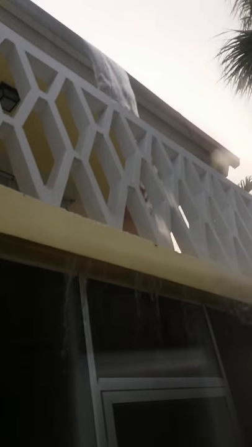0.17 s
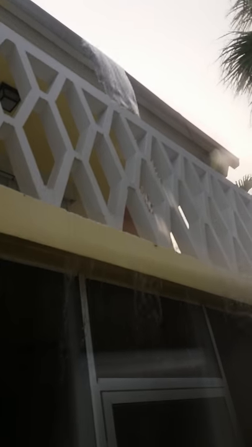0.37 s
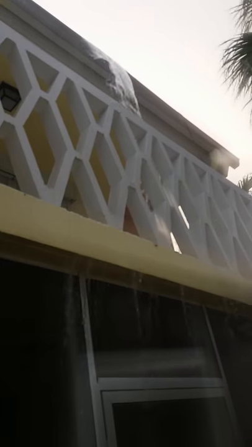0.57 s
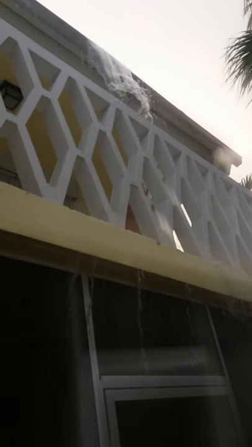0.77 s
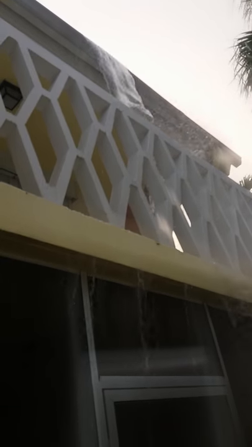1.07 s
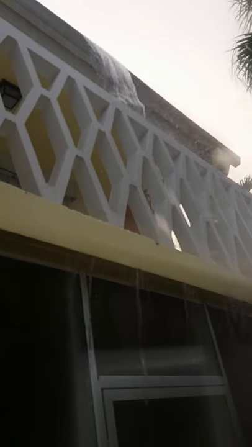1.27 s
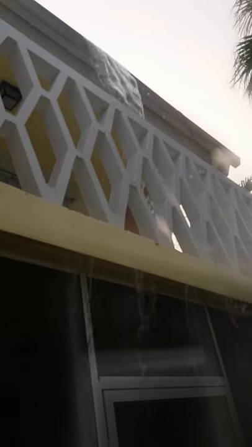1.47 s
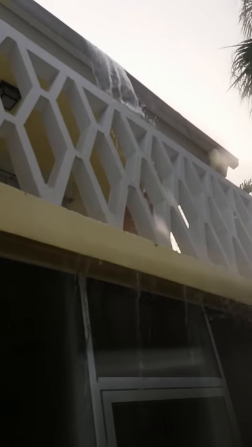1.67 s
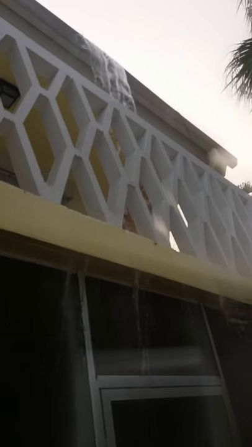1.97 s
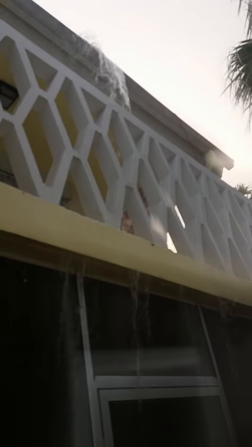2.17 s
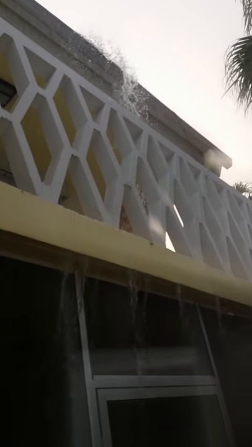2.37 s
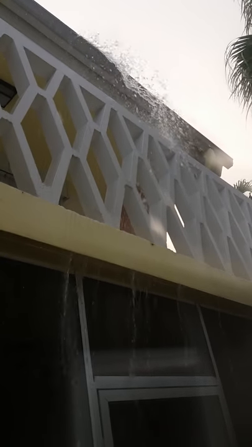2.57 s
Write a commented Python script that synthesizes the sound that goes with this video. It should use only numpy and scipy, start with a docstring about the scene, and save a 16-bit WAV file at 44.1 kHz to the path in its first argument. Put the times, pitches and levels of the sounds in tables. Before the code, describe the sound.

Steady splashing of overflowing gutter water, bright spray and pattering drops, one small thump early on

```python
"""Rainwater overflows a roof gutter onto ledge and ground, over motor hum (sines) and rumble (noise).
From the start: coloured random impacts hiss and patter, noise ticks, sine bubbles ring, lumps splat and slap.
At 0.6 s a drop thumps on the microphone (falling sine) and the level dips briefly.
The stream then slackens until about 1.2 s and swells to the end."""
import sys
import numpy as np
from scipy import signal
from scipy.fft import rfft, irfft
from scipy.io import wavfile
from scipy.ndimage import uniform_filter1d

SR = 44100
rng = np.random.default_rng(int(sys.argv[2]) if len(sys.argv) > 2 else 0)


def generate_wav(sig):
    """Save sig (samples, or channels by samples) to the path in sys.argv[1] as 16-bit PCM at SR."""
    pcm = np.round(np.clip(np.atleast_2d(sig).T, -1, 1) * 32767).astype(np.int16)
    wavfile.write(sys.argv[1], SR, pcm)


N = 120393

# outdoor rumble: t/s, level/dB
RUMBLE_LEVEL = [(0, -67), (.12, -58), (.36, -59), (.48, -48), (.65, -61), (1.17, -59.5), (1.35, -64.5),
                (1.75, -63), (2.0, -55.5), (2.4, -55.5), (2.73, -53)]
# rumble colour: f/Hz, relative level/dB
RUMBLE_COLOUR = [(15, -38), (35, -15), (55, -6), (80, -1.5), (105, -0.5), (130, 10), (165, -3), (250, -9.5),
                 (600, -24), (3000, -66)]
# motor hum: t/s, 2nd partial level/dB, 3rd partial level/dB, 4th partial level/dB
HUM_LEVELS = [(0, -60, -70, -77), (.65, -54.5, -68, -68), (1.05, -56, -70, -78), (1.45, -57, -64, -68),
              (1.8, -73, -61.5, -65), (2.1, -64, -55, -63), (2.4, -56, -54, -60), (2.73, -51.5, -57, -51)]
# strength of the spill, before each source's gain: t/s, spray level/dB, patter level/dB
FLOW = [(0, -27, -45), (.42, -25.5, -43), (.8, -29.5, -46.5), (.92, -32, -49), (1.23, -35, -52),
        (1.5, -33, -49), (1.8, -31, -47.5), (2.05, -27.5, -44), (2.35, -24.5, -40.5), (2.73, -24, -38)]
# lumps slapping into the puddle, before gain: t/s, cavity f/Hz, length/s, level/dB
SLAPS = [(0.103, 1900, .01, -27.5), (0.361, 2470, 0.024, -31), (0.43, 2180, 0.012, -29.5),
         (0.708, 2150, 0.0074, -25.5), (0.72, 1850, 0.026, -29), (.849, 1740, .011, -28),
         (.960, 1640, .006, -31), (1.01, 1750, .008, -36), (1.04, 2250, .01, -39),
         (1.306, 2210, 0.005, -31), (1.326, 1780, 0.023, -34.5), (1.717, 2120, 0.0074, -32.5),
         (2.057, 1900, .006, -34), (2.207, 1720, 0.0076, -23.5), (2.219, 2200, 0.013, -33.5),
         (2.283, 1900, 0.0034, -17.5), (2.598, 1790, .009, -27.5), (2.626, 1980, .012, -29)]
# lumps bursting on the ledge, before gain: t/s, length/s, level/dB
SPLATS = [(0.029, .005, -26.5), (0.061, 0.025, -27), (.105, .008, -23), (.192, .004, -21.5),
          (0.367, 0.017, -25), (.545, 0.011, -22.5), (0.623, .006, -23.5), (0.657, .006, -33),
          (.718, 0.0066, -22), (0.744, .012, -33), (0.829, 0.0066, -24), (0.843, 0.01, -27),
          (0.959, 0.0033, -24), (1.005, 0.02, -27.5), (1.031, 0.019, -32), (1.110, 0.0043, -25.5),
          (1.266, 0.0073, -33), (1.336, .014, -28), (1.598, 0.021, -29), (1.719, .008, -32),
          (1.734, 0.0085, -26.5), (1.897, .004, -29), (1.912, .01, -25.5), (1.964, .005, -26),
          (2.006, .006, -31), (2.054, .008, -26), (2.189, .004, -27.5), (2.253, 0.013, -24.5),
          (2.28, 0.0037, -22), (2.317, 0.0062, -23.5), (2.403, 0.0068, -21), (2.492, 0.01, -26),
          (2.612, .005, -20.5)]
# colour of splats and close drips: f/Hz, relative level/dB
SPLAT_COLOUR = [(60, -45), (300, -35), (1000, -7), (1700, -1), (3200, -4), (5000, 2.5), (6500, 1),
                (7600, 6.5), (8800, -1.5), (10000, -5), (13000, -5), (15700, -6)]
# colour of the puddle patter: f/Hz, relative level/dB
PATTER_COLOUR = [(30, -34), (100, -12), (220, -8.5), (400, -5), (620, -2.5), (780, 1), (1050, 1),
                 (1300, 1.5), (1800, -7.5), (3000, -18.5), (8000, -44)]
# colour of the spray: f/Hz, relative level/dB
SPRAY_COLOUR = [(200, -50), (900, -30.5), (1400, -10.5), (1700, -4.5), (2100, -7.5), (2700, -7),
                (3300, -4.5), (3900, -6.5), (4800, -5.5), (6400, -3.5), (7200, -1), (7750, 2.5),
                (8300, -1.5), (9000, -9.5), (10000, -10), (12300, -9.5), (14000, -8), (15700, -11)]
# left minus right microphone port: f/Hz, level difference/dB
PORT_TILT = [(60, 5), (130, -0.5), (280, 4), (600, 3), (1100, .5), (1700, .5), (2400, -1), (3200, -6.5),
             (4100, -11.5), (5000, -16), (6000, -16.5), (7000, -11), (7700, -6.5), (8300, -2.5), (9500, -1),
             (12000, -5), (15500, -7)]

HUM_FUNDAMENTAL_HZ = 148.4
THUMP_S, THUMP_DB, THUMP_DECAY_S = 0.5985, -10, 0.0031
THUMP_START_HZ, THUMP_END_HZ, THUMP_FALL_S = 1900, 75, 0.00085
CASE_HZ, CASE_DB, CASE_DECAY_S = 2040, -20.5, 0.0023
DIP_S, DIP_DB, DIP_WIDTH_S = 0.607, -5, 0.016
CLOSE_PER_S, CLOSE_SCATTER_DB, CLOSE_GAIN_DB = 70, 4, -13
BUBBLES_PER_S, BUBBLE_SCATTER_DB = 260, 5
BUBBLE_HZ, BUBBLE_SPREAD_OCT, BUBBLE_DECAY_CYCLES, BUBBLE_RISE = 1940, 0.258, 3.36, 0.047
TICKS_PER_S, TICK_SCATTER_DB, TICK_GAIN_DB = 330, 3.5, -6.5
TICK_HZ, TICK_SPREAD_OCT, TICK_REL_WIDTH, TICK_DECAY_S = 7070, 0.54, 0.54, 0.0011
SLAP_WIDTH_HZ, SLAP_GAIN_DB = 940, 1
LUMP_DROPS_PER_S, LUMP_SCATTER_DB, LUMP_ATTACK_S, SPLAT_GAIN_DB = 12000, 3.5, 0.00079, 3.5
PATTER_PER_S, PATTER_SCATTER_DB, PATTER_GAIN_DB = 2500, 3.5, 5.5
FINE_PER_S, NEAR_PER_S, DROP_SCATTER_DB, SPRAY_GAIN_DB = 9000, 3000, 4.5, 3
CLUMP_DB, FLUTTER_DB, SURGE_DB = 1.0, 0.5, 0.35
PORT_LAG_S, WALL_DECAY_S = 0.00043, 0.0051
TOP_HZ = 15800


def undb(db):
    """Decibels to amplitude gain."""
    return 10 ** (np.asarray(db) / 20)


def unit(x):
    """Scale to rms 1."""
    return x / np.sqrt(np.mean(x ** 2) + 1e-18)


def age_since(start_s):
    """Seconds since an onset, zero before it."""
    return np.maximum(np.arange(N) / SR - start_s, 0)


def curve(table):
    """Interpolate each level column of a timed table at every sample."""
    times_s, *columns = np.array(table, float).T
    return [np.interp(np.arange(N) / SR, times_s, column) for column in columns]


def spectrum(points, bins_hz):
    """Interpolate a frequency table in dB over log frequency."""
    hz, db = np.array(points, float).T
    return np.interp(np.log(bins_hz + 1), np.log(hz), db)


def colour(x, db):
    """Minimum-phase filter, by folding the cepstrum of the dB response."""
    cepstrum = irfft(np.log(undb(db)))
    half = len(cepstrum) // 2
    cepstrum[1:half] *= 2
    cepstrum[half + 1:] = 0
    response = irfft(np.exp(rfft(cepstrum)))[:half]
    return signal.fftconvolve(np.atleast_2d(x), response[None], axes=1)[:, :N]


def shaped(x, points):
    """Colour a white sound, keeping its power."""
    db = spectrum(points, np.arange(4097) * SR / 8192)
    return colour(x, db - 10 * np.log10(np.mean(undb(db) ** 2)))


def walk(rate_hz):
    """Smoothed random steps, rms 1."""
    hold = max(int(SR / rate_hz), 2)
    steps = np.repeat(rng.standard_normal(N)[:N // hold + 1], hold)
    return unit(uniform_filter1d(steps, hold)[:N])


def drops(per_s, scatter_db):
    """Random impacts of either sign and uneven size, rms 1."""
    hit = rng.random(N) < per_s / SR
    sign = np.sign(rng.standard_normal(N))
    size_db = scatter_db * np.clip(rng.standard_normal(N), -3, 3)
    return unit(hit * sign * undb(size_db))


def space(x, wet_db):
    """Direct sound reaches the right port first; wall reflections match at both ports only in the bass."""
    t = np.arange(SR // 10) / SR
    hz = np.fft.rfftfreq(N, 1 / SR)
    walls = rng.standard_normal((2, len(t))) * np.exp(-t / WALL_DECAY_S)
    walls /= np.sqrt(np.sum(walls ** 2, axis=1, keepdims=True))
    # fresh noise under the smeared energy: every drop gets its own reflections
    energy = signal.fftconvolve(x[None] ** 2, walls ** 2, axes=1)[:, :N]
    mid, side = rfft(np.sqrt(np.abs(energy)) * rng.standard_normal((2, N)))
    power = uniform_filter1d(np.abs(rfft(x)) ** 2, size=400)
    tone = np.sqrt(np.abs(power) / np.sum(x ** 2))
    alike = 0.98 * np.sinc(2 * hz * PORT_LAG_S)
    common = mid * np.sqrt(1 + alike)
    opposed = np.array([[1], [-1]]) * side * np.sqrt(1 - alike)
    echoes = tone * (common + opposed) / np.sqrt(2)
    lag_s = np.array([[PORT_LAG_S], [0]])
    direct = rfft(x) * np.exp(-2j * np.pi * hz * lag_s)
    return irfft(direct + undb(wet_db) * echoes, N) / np.hypot(1, undb(wet_db))


def burst(start_s, length_s):
    """Envelope of a lump landing: quick rise, short hold, fade."""
    age = age_since(start_s)
    return (1 - np.exp(-age / LUMP_ATTACK_S)) / (1 + (age / length_s) ** 4)


def rumble():
    """Low coloured noise, nearly equal at both ports."""
    air = rng.standard_normal(N) + 0.14 * rng.standard_normal((2, N))
    return unit(shaped(air, RUMBLE_COLOUR)) * undb(curve(RUMBLE_LEVEL)[0])


def hum():
    """Motor partials 2 to 4 swell and fade; the shared fundamental wanders by 0.1 %."""
    turns = np.cumsum(HUM_FUNDAMENTAL_HZ * (1 + 0.001 * walk(3))) / SR
    out = 0
    for partial, db in enumerate(curve(HUM_LEVELS), 2):
        out = out + np.sqrt(2) * undb(db) * np.sin(2 * np.pi * partial * turns)
    return out


def thump():
    """A drop strikes the right port: a pressure swing of falling pitch; the casing rings at both."""
    age = age_since(THUMP_S)
    fall_hz = THUMP_START_HZ - THUMP_END_HZ
    cycles = THUMP_END_HZ * age + fall_hz * THUMP_FALL_S * (1 - np.exp(-age / THUMP_FALL_S))
    push = -undb(THUMP_DB) * np.sin(2 * np.pi * cycles) * np.exp(-age / THUMP_DECAY_S)
    ring = undb(CASE_DB) * np.sin(2 * np.pi * CASE_HZ * age) * np.exp(-age / CASE_DECAY_S)
    return np.array([ring, push + ring])


def close_drips(flow_db):
    """Sparse impacts beside the microphone click with weak reflections."""
    clicks = space(drops(CLOSE_PER_S, CLOSE_SCATTER_DB), wet_db=-8)
    return unit(shaped(clicks, SPLAT_COLOUR)) * undb(flow_db + CLOSE_GAIN_DB)


def bubbles(flow_db):
    """Air trapped in the puddle rings for a few cycles, rising slightly in pitch."""
    out, age = np.zeros(N + 1024), np.arange(1024) / SR
    for start in np.flatnonzero(rng.random(N) < BUBBLES_PER_S / SR):
        pitch, size = np.clip(rng.standard_normal(2), -2, 2)
        cycles = age * BUBBLE_HZ * 2 ** (BUBBLE_SPREAD_OCT * pitch)
        life = cycles / BUBBLE_DECAY_CYCLES
        ring = np.exp(-life) * np.sin(2 * np.pi * cycles * (1 + BUBBLE_RISE * life))
        out[start:start + len(age)] += undb(BUBBLE_SCATTER_DB * size) * ring
    return unit(space(out[:N], wet_db=-7)) * undb(flow_db)


def ticks(flow_db):
    """Single nearer droplets shatter: millisecond noise, resonant at each one's own pitch."""
    out, age = np.zeros(N + 512), np.arange(512) / SR
    for start in np.flatnonzero(rng.random(N) < TICKS_PER_S / SR):
        pitch, size = np.clip(rng.standard_normal(2), -2, 2)
        hz = min(TICK_HZ * 2 ** (TICK_SPREAD_OCT * pitch), SR / 3)
        b, a = signal.iirpeak(hz, 1 / TICK_REL_WIDTH, fs=SR)
        crack = signal.lfilter(b, a, rng.standard_normal(len(age)) * np.exp(-age / TICK_DECAY_S))
        out[start:start + len(age)] += undb(TICK_SCATTER_DB * size) * unit(crack)
    return unit(space(out[:N], wet_db=-5)) * undb(flow_db + TICK_GAIN_DB)


def slaps():
    """Lumps hitting standing water ring a short-lived cavity: resonant noise, gated, filtered again."""
    out = 0
    for start_s, hz, length_s, db in SLAPS:
        shape = burst(start_s, length_s)
        b, a = signal.iirpeak(hz, hz / SLAP_WIDTH_HZ, fs=SR)
        tone = signal.lfilter(b, a, rng.standard_normal(N))
        ring = signal.lfilter(b, a, tone * shape)
        out = out + unit(ring) * np.sqrt(np.mean(shape ** 2)) * undb(db + SLAP_GAIN_DB)
    return space(out, wet_db=-12)


def splats():
    """Each lump bursts into a short shower of droplets."""
    force = sum(undb(db) * burst(start_s, length_s) for start_s, length_s, db in SPLATS)
    shower = np.array([drops(LUMP_DROPS_PER_S, LUMP_SCATTER_DB) for _ in range(2)])
    return shaped(shower * force, SPLAT_COLOUR) * undb(SPLAT_GAIN_DB)


def patter(flow_db):
    """Heavier drops patter into the puddle with uneven strength."""
    hits = drops(PATTER_PER_S, PATTER_SCATTER_DB) * undb(1.02 * walk(49.92))
    return unit(shaped(space(hits, wet_db=0.5), PATTER_COLOUR)) * undb(flow_db + PATTER_GAIN_DB)


def spray(flow_db):
    """Dense droplets hiss in clumps: wide ones independent per port, nearer ones shared."""
    clumps = undb(CLUMP_DB * walk(330) + FLUTTER_DB * walk(70) + SURGE_DB * walk(20))
    fine = np.array([drops(FINE_PER_S, DROP_SCATTER_DB) for _ in range(2)])
    near = space(drops(NEAR_PER_S, DROP_SCATTER_DB), wet_db=-7)
    droplets = (fine + undb(-3.5) * near) * clumps
    return unit(shaped(droplets, SPRAY_COLOUR)) * undb(flow_db + SPRAY_GAIN_DB)


def ports(sound):
    """The two microphone ports favour different bands; their summed power gain is constant."""
    tilt_db = spectrum(PORT_TILT, np.fft.rfftfreq(N, 1 / SR))
    gain = np.sqrt(2 / (1 + undb(np.array([-tilt_db, tilt_db])) ** 2))
    return irfft(rfft(sound) * gain, N)


def scene():
    """Water and background through the ports, dipping briefly around the thump."""
    spray_db, patter_db = curve(FLOW)
    background = rumble() + hum()
    details = close_drips(spray_db) + bubbles(patter_db) + ticks(spray_db)
    water = details + slaps() + splats() + patter(patter_db) + spray(spray_db)
    dip = undb(DIP_DB * np.exp(-((np.arange(N) / SR - DIP_S) / DIP_WIDTH_S) ** 2))
    return ports(water + background) * dip + thump()


def record(dry):
    """The recorder cuts the top with a linear-phase low-pass."""
    lowpass = signal.firwin(801, TOP_HZ, window=("kaiser", 8), fs=SR)
    return signal.fftconvolve(dry, lowpass[None], "same", axes=1)


dry = scene()
out = record(dry)
generate_wav(out)
```